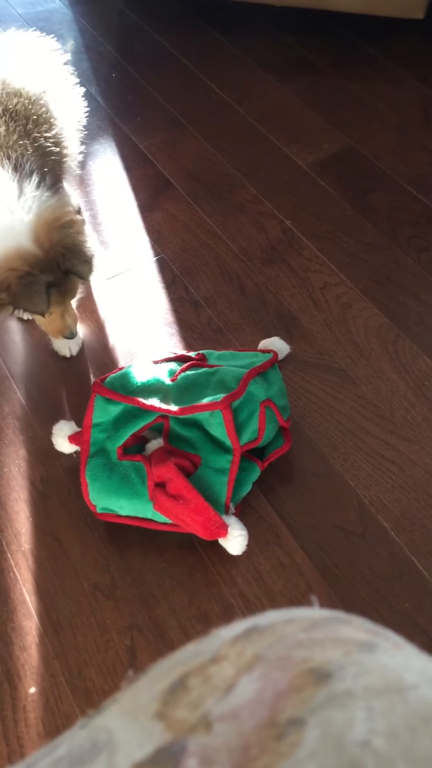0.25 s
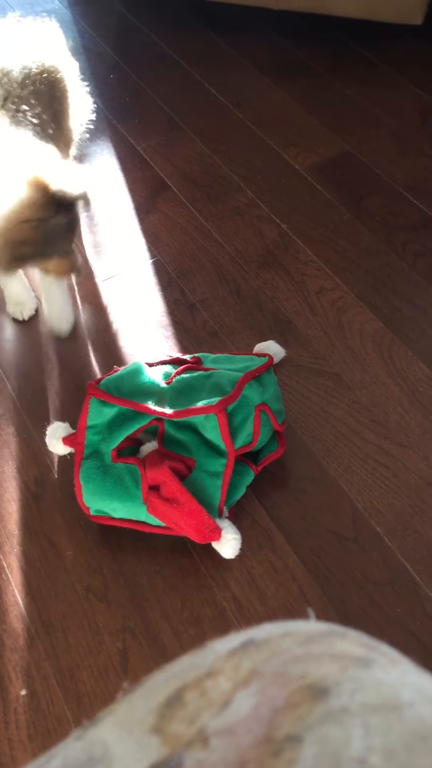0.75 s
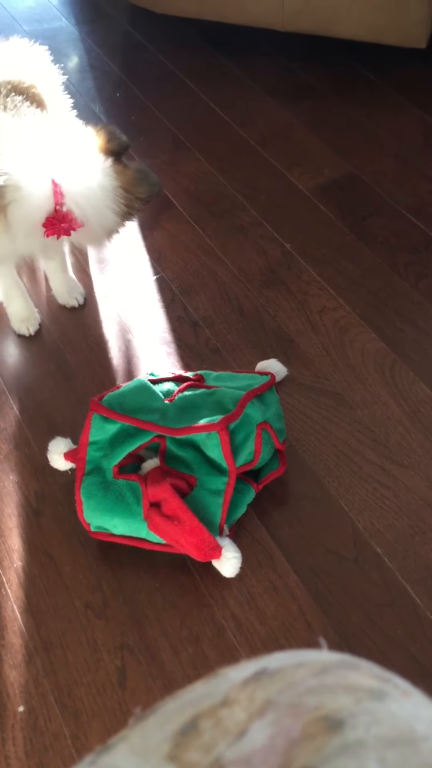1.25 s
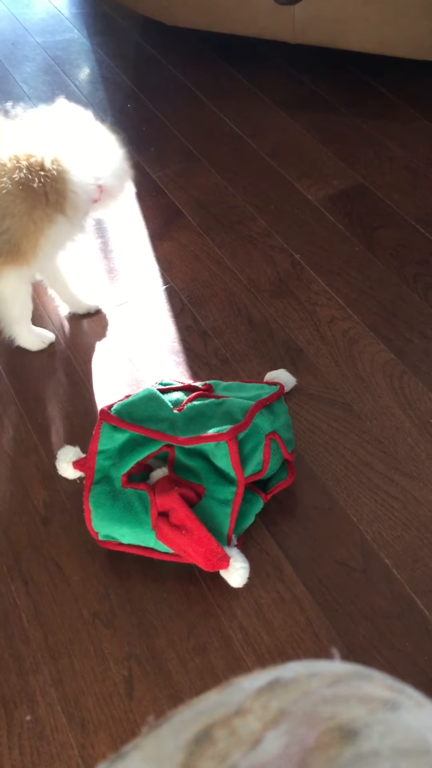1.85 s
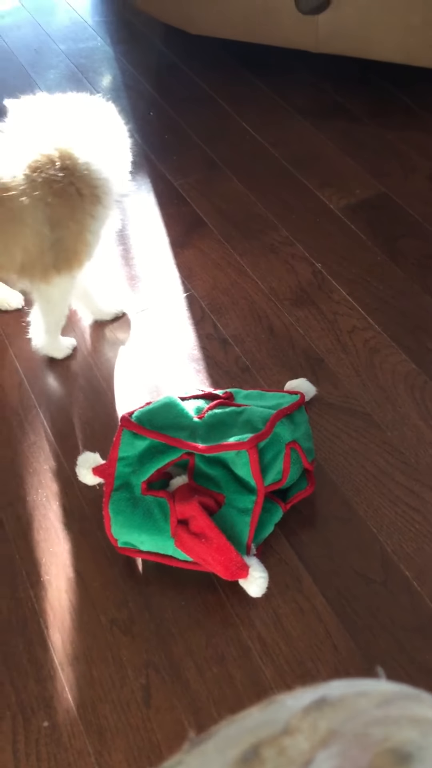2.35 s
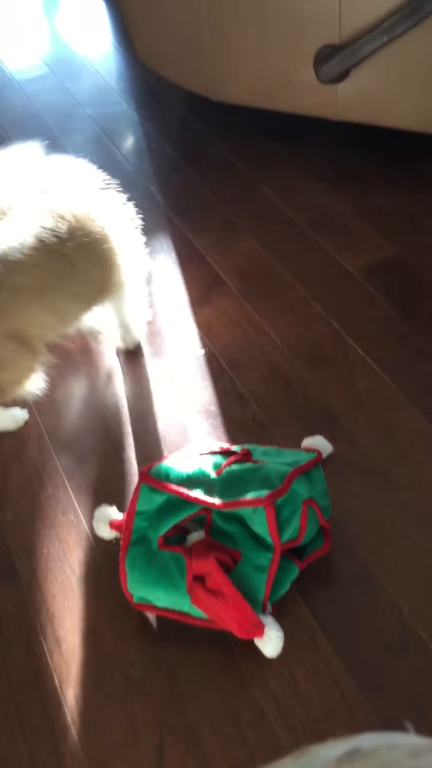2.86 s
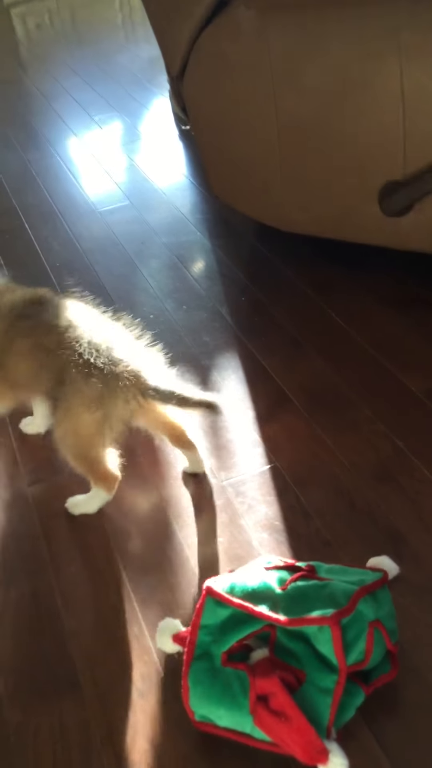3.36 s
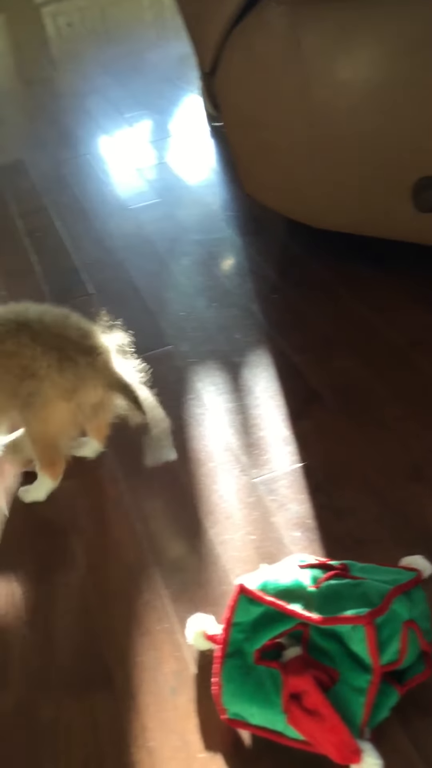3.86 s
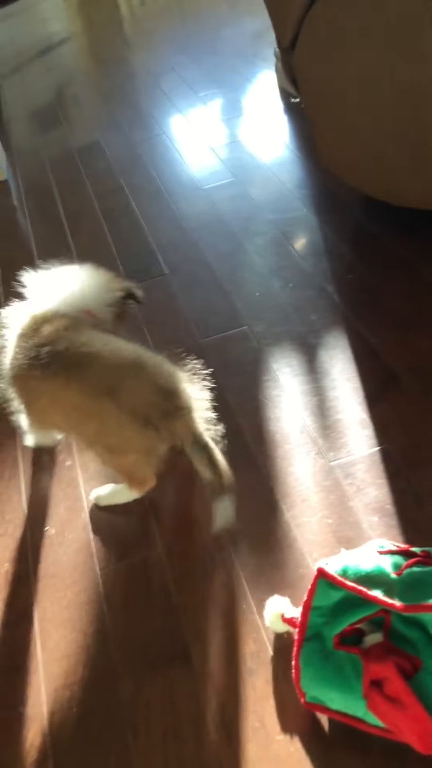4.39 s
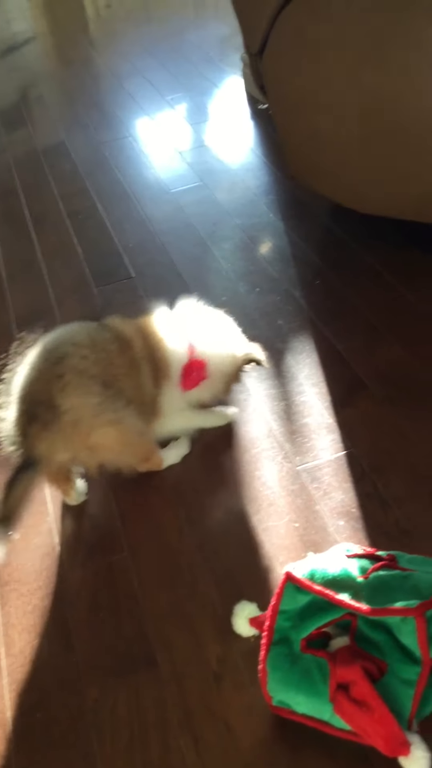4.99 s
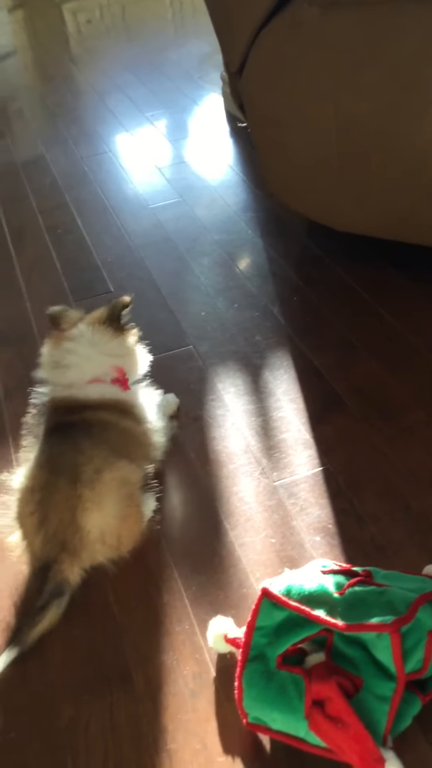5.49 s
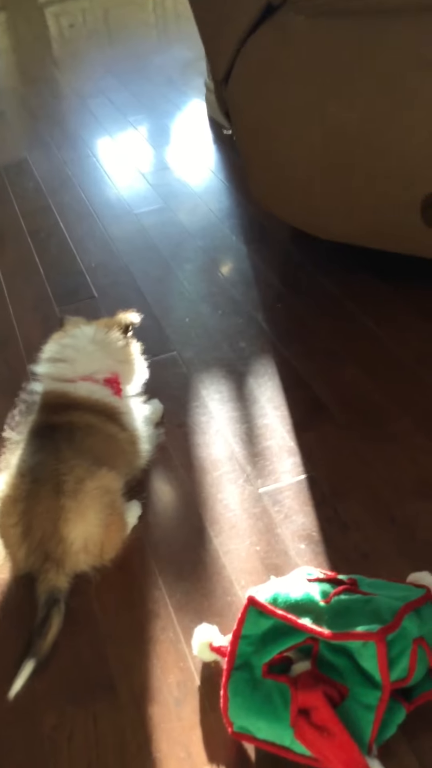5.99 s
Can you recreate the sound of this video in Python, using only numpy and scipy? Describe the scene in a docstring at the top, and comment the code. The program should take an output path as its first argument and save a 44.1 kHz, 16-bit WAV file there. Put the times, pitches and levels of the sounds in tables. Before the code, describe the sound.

In a quiet living room, a puppy's claws tap faintly on a hardwood floor, in small clusters with pauses between them. The taps grow louder and quicker, mixed with short scratches and soft low paw thumps, and peak in a brief scramble. After a few faint scuffs, something close by gives one soft creak. The room rings slightly, and a low rumble lies underneath.

```python
"""Claws tap and scratch on a hardwood floor as a puppy steps, skids and pounces in a quiet living room.
Each tap is a click of the claw and a knock of the board. Sliding claws catch on the grain, nail tips
ping off the varnish, soft pads shuffle, and the puppy's weight thumps the floor. The room rings on.
Near the end something close by creaks softly as it sticks and slips. A low rumble lies under it all."""
import sys
import numpy as np
from scipy import signal
from scipy.fft import rfft, irfft, next_fast_len
from scipy.io import wavfile
from scipy.ndimage import uniform_filter1d

SR = 44100
rng = np.random.default_rng(int(sys.argv[2]) if len(sys.argv) > 2 else 0)


def master_out(mix):
    """Clip the mix to full scale and print it as 16-bit PCM to the path in sys.argv[1]."""
    frames = np.transpose(np.atleast_2d(mix))
    ceiling = np.clip(frames, -1, 1)
    pcm = np.round(ceiling * 32767).astype(np.int16)
    wavfile.write(sys.argv[1], SR, pcm)


N = 274958
T = np.arange(SR // 8) / SR  # seconds within one touch of the floor


def claw_taps(knock_db=-3.5, rattle_db=-9, chatter=0.1, knock_width_hz=560, click_width_hz=1000,
              knock_t60=0.093, click_t60=0.062, tick_t60=0.053, strike_s=0.001):
    """A claw taps with a tick and a click; the board knocks, its pitch unsteady as the claw chatters."""
    # claw taps and a couple of their quick echoes: t/s, level/dB, board f/Hz, click f/Hz,
    # hardness (0 = padded, 1 = bare claw), room level/dB, contact length/s, first blow/dB, board ring/dB
    taps = [(0.3994, -56, 1415, 1950, 0.82, -7.5, 0.01, 0, -20.5),
            (0.936, -60, 1380, 3630, .6, -3, .009, -6, -32),
            (0.986, -52, 1296, 2300, .33, -11, 0.012, -3, -27),
            (1.665, -45.5, 1070, 3600, 0.39, -16, 0.0077, -5, -26),
            (1.676, -41.5, 1122, 2300, 0.35, -16, 0.012, -7, -20),
            (1.729, -34.5, 1295, 2210, 0.19, -12, 0.017, -10, -31),
            (1.7984, -37, 1270, 2000, 0.35, -9, 0.0064, -3, -25),
            (1.8336, -37, 1070, 2100, .22, -14, 0.01, -3, -21.5),
            (1.8425, -37.5, 1090, 1800, .05, -13, 0.0037, -5, -25),
            (1.863, -43, 1080, 2000, 0.022, -20, 0.0042, -1, -31),
            (1.928, -60.5, 1240, 3500, .89, -6, 0.0087, 1, -31),
            (2.069, -59, 1430, 2310, .14, -8, 0.015, -10, -26),
            (2.113, -52.5, 1005, 3700, .53, -3, .012, 1, -32),
            (2.137, -41.5, 1361, 2200, 0.33, -7, 0.013, 3, -24),
            (2.162, -46, 1353, 2420, 0.35, -10.5, 0.0044, -3, -20),
            (2.836, -60.5, 1660, 2200, 0.65, -22, 0.0064, 0, -31),
            (2.8963, -44, 1453, 1800, 0.15, -9.5, 0.0056, -10, -21),
            (2.904, -43, 1243, 1800, 0.13, -9, 0.0027, -17, -23),
            (2.931, -60, 1160, 2950, 0.82, -13, 0.0079, -1, -19),
            (3.269, -61.5, 1430, 2000, .1, -8, 0.031, -10, -22),
            (3.533, -48.5, 1127, 2300, 0.99, -13, .002, -2, -16),
            (3.854, -36.5, 1750, 4140, 0.95, -8.5, 0.0019, 0, -25),
            (3.902, -43, 1186, 3180, .1, -13, 0.016, -12, -17),
            (3.919, -35.5, 1220, 1800, 0.52, -12, 0.0039, -10, -21.5),
            (4.046, -25, 1400, 2040, 0.55, -10, 0.012, 5.5, -21.5),
            (4.386, -59, 1230, 2500, .3, 2, 0.0071, -6, -26),
            (4.429, -51.5, 1385, 4480, 0.61, -5, .009, 0, -26),
            (4.505, -46.5, 1100, 3080, 0.77, -8, 0.0082, 3, -28),
            (4.562, -38, 1285, 3090, .09, -7, 0.018, -10, -20),
            (4.683, -31.5, 1230, 1950, 0.75, -6.5, .005, 5.5, -30),
            (4.7522, -26.5, 1173, 3020, 0.78, -22, 0.01, 14.5, -19.5),
            (4.7928, -24, 1610, 3350, 0.93, -11.5, 0.0049, 3, -34),
            (4.7953, -28.5, 1100, 2400, 0.95, -7.5, 0.0047, -2, -19.5),
            (4.801, -27.5, 1730, 3950, 0.82, -11, 0.0027, 7, -32),
            (5.104, -43.5, 1407, 4400, 0.67, -9.5, .011, -3, -19)]
    # tone of the click: f/Hz, level/dB
    click_tone = [(100, 14.5), (400, 12.5), (900, 7.5), (2000, -1), (3000, -0.5), (4800, 2), (6000, 1.5),
                  (12000, -37)]
    # tone of the high tick: f/Hz, level/dB
    tick_tone = [(2000, -20), (5000, -1), (7000, -3.5), (11000, -7.5), (16000, -11.5)]
    out = np.zeros(N)
    strike = np.exp(-T / strike_s)  # the first blow is the hardest
    for start, db, knock_hz, click_hz, hardness, wet_db, length, strike_db, ring_db in taps:
        click_db = np.interp(hardness, (0, 1), (-24.5, -2.5))
        tick_db = np.interp(hardness ** 2, (0, 1), (-34, -6))  # only a nearly bare claw ticks clearly
        attack_s = np.interp(hardness, (0, 1), (0.00069, 0.00051))  # a pad eases in more slowly
        contact = amp(strike_db) * strike + decay(T, knock_t60) / (1 + (T / length) ** 8)
        contact *= 1 - np.exp(-T / attack_s)
        pitch = knock_hz * (1 + chatter * wander(len(T), count=60))
        wood = lambda f: abs(resonance(f, knock_hz, knock_width_hz)) ** 2 + 0.075
        rattle = burst(lambda f: wood(f) / (1 + (f / 2600) ** 4), contact)
        knock = contact * glide(pitch) + amp(rattle_db) * rattle
        claw = lambda f: 0.074 + abs(resonance(f, click_hz, click_width_hz))
        click = burst(lambda f: amp(along(click_tone, f)) * board_gain(f) * claw(f), decay(T, click_t60))
        tick = burst(lambda f: amp(along(tick_tone, f)), decay(T, tick_t60) + strike ** 4)
        tap = amp(knock_db) * knock + amp(click_db) * click + amp(tick_db) * tick
        add(out, start, in_room(amp(db) * tap, wet_db))
        add(out, start, amp(db + ring_db) * board_ring(knock_hz))
    return out


def board_ring(hz, ring_t60=0.63, width_hz=85, swell_s=0.012):
    """The struck board hums on in a narrow band around its own pitch."""
    t = np.arange(SR // 2) / SR
    envelope = (1 - np.exp(-t / swell_s)) * decay(t, ring_t60)
    return burst(lambda f: abs(resonance(f, hz, width_hz)) ** 2, envelope)


def board_gain(hz):
    """The boards boost the pitches at which they naturally ring."""
    # ringing pitches of the boards: f/Hz, width/Hz, level/dB
    modes = [(540, 99, 3), (1079, 13, 11), (1360, 88, -13), (1640, 260, 8), (2290, 230, 6), (2460, 51, 8),
             (3086, 200, 2.5), (3580, 86, 1), (4030, 160, -1), (4420, 320, -19), (5320, 310, -5),
             (5780, 40, 1), (7080, 44, -22)]
    power = sum(abs(2 * amp(db) * resonance(hz, centre, width)) ** 2 for centre, width, db in modes)
    return np.sqrt(1 + power)


def nail_pings(ping_t60=0.034, width_hz=650):
    """The tip of a nail flicks off the varnish and rings briefly at its own bright pitch."""
    # nail flicks: t/s, level/dB, f/Hz
    flicks = [(0.402, -57, 4360), (0.938, -69, 5450), (1.796, -50.5, 4230), (1.799, -44, 2340),
              (2.136, -64, 4560), (4.046, -35.5, 2250), (4.794, -52, 4300)]
    out = np.zeros(N)
    for start, db, hz in flicks:
        ping = burst(lambda f: abs(resonance(f, hz, width_hz)) ** 3, decay(T, ping_t60))
        add(out, start, in_room(amp(db) * ping, wet_db=-18.5))
    return out


def claw_scrapes(rough_db=0.8, uneven_db=0.7, grain_db=5, rise_share=0.46,
                 scratch_width_hz=220, nail_hz=4370, nail_width_hz=120, nail_db=-3.5):
    """A sliding claw catches on the grain many times a second; each catch rings claw and boards."""
    # slides: loudest t/s, level/dB, length/s, treble tilt/(dB per octave), scratch f/Hz, claw ring/dB
    slides = [(0.395, -66, 0.022, -1, 4830, 8), (0.403, -71, 0.08, 7, 4700, -11),
              (1.674, -57, 0.033, 2, 3600, -13), (3.041, -70, 0.029, 9, 4760, 7),
              (3.579, -56, 0.021, 1.5, 3150, -11), (3.778, -60.5, 0.043, 5, 6900, 5),
              (3.826, -57.5, 0.048, 6.5, 4320, -2), (3.833, -44, 0.019, 8, 5440, -14),
              (3.857, -35.5, 0.008, 5, 3500, -25), (3.98, -57, .009, 5, 7840, 6),
              (4.254, -66.5, 0.024, 0, 4500, -13), (4.391, -73, 0.19, 5.5, 4540, -10),
              (4.526, -61.5, .04, 6, 4480, 1), (4.564, -40, 0.022, 2.5, 3080, -2.5),
              (4.695, -40, .014, 1.5, 2580, 0), (4.706, -47.5, 0.024, 3, 3690, 8),
              (4.731, -56, 0.022, 5, 4700, -2), (4.792, -38, 0.0067, 1, 2800, 10),
              (4.826, -48, .009, 0, 1750, 9), (4.847, -48, .035, 1, 4300, 7),
              (5.21, -68, 0.17, 6.5, 4500, -22), (5.379, -63.5, 0.074, 3, 1940, 0),
              (5.44, -64.5, 0.16, 5, 4540, -22)]
    # tone of the gritty rubbing: f/Hz, level/dB
    grit_tone = [(100, -10), (500, -18), (800, -2), (1200, 13.5), (2000, -2), (4500, 4), (8000, -1.5),
                 (13000, -4.5), (16000, -15.5)]
    out = np.zeros(N)
    t = np.arange(-SR // 4, SR // 4) / SR
    for middle, db, length, tilt, scratch_hz, ring_db in slides:
        rise, fall = length * rise_share, length * (1 - rise_share)  # speeding up, slowing down
        stroke = np.exp(-np.abs(t / np.where(t < 0, rise, fall)) ** 1.2)
        catches = amp(rough_db * wander(len(t), count=50) + uneven_db * wander(len(t), count=900))
        grains = catches * rng.standard_normal(len(t)) * amp(grain_db * rng.standard_normal(len(t)))
        nail = lambda f: amp(nail_db) * resonance(f, nail_hz, nail_width_hz)
        claw = lambda f: 1 + 2 * amp(ring_db) * (resonance(f, scratch_hz, scratch_width_hz) + nail(f))
        grit = lambda f: amp(along(grit_tone, f) + tilt * np.log2((f + 500) / 4000))
        scratch = filtered(stroke * grains, lambda f: grit(f) * board_gain(f) * claw(f))
        scratch = unit(across_grain(scratch)) * rms(stroke)
        add(out, middle + t[0], in_room(amp(db) * scratch, wet_db=-8))
    return out


def across_grain(x, patchy_db=3.5):
    """The tone of a scratch shifts from moment to moment as the claw crosses the grain."""
    spectrum = signal.stft(x, nperseg=256)[2]
    patches = uniform_filter1d(rng.standard_normal(spectrum.shape), size=5, axis=0)  # smooth over pitch
    patches = uniform_filter1d(patches, size=7, axis=1)  # and over time
    return signal.istft(spectrum * amp(patchy_db * unit(patches)), nperseg=256)[1][:len(x)]


def pad_scuffs(width_hz=700, rough_db=3):
    """A soft pad shuffles over the boards: a dull, woody rub."""
    # shuffles: loudest t/s, level/dB, length/s, f/Hz
    shuffles = [(0.405, -70, 0.027, 885), (0.995, -66, .025, 850), (1.842, -54, .014, 930),
                (2.902, -64.5, .018, 900), (4.38, -65.5, .035, 1170), (4.428, -63, 0.056, 1100),
                (4.512, -61.5, .025, 1100), (5.107, -55.5, .014, 850), (5.146, -60, .014, 1210)]
    out = np.zeros(N)
    t = T - T.mean()
    for middle, db, length, hz in shuffles:
        stroke = np.exp(-(2 * t / length) ** 2) * amp(rough_db * wander(len(t), count=100))
        rub = burst(lambda f: abs(resonance(f, hz, width_hz)) ** 3, stroke)
        add(out, middle + t[0], in_room(amp(db) * rub, wet_db=-9))
    return out


def paw_thumps(boom_t60=0.23, rise_s=0.0021, trim_db=-4):
    """Soft pads land under the puppy's weight and shake only the low notes out of the floor."""
    # paws landing on the boards: t/s, level/dB
    thumps = [(0.987, -56), (2.168, -52), (2.567, -51), (2.843, -54), (3.271, -59.5), (3.547, -49),
              (3.89, -46), (4.049, -52.5), (4.385, -47), (4.589, -48.5), (4.681, -44.5), (4.738, -38.5),
              (4.752, -46), (4.791, -36), (5.481, -53.5)]
    # tone of the floor's boom: f/Hz, level/dB
    boom_tone = [(30, -34), (80, -9.5), (135, 6), (185, 7.5), (260, -12), (380, -10.5), (530, -20.5),
                 (750, -14), (1200, -45)]
    out = np.zeros(N)
    envelope = (1 - np.exp(-T / rise_s)) * decay(T, boom_t60)
    for start, db in thumps:
        boom = burst(lambda f: amp(along(boom_tone, f)), envelope)
        add(out, start, in_room(amp(db + trim_db) * boom, wet_db=-39))
    return out


def creak(snap_hz=1600, snap_s=0.00069, sag_s=0.00075, dull_hz=1750,
          push_hz=170, push_db=-3, push_t60=0.032, rub_db=-15, rub_s=0.0023, lead_s=0.0015):
    """Something close sticks and slips: each slip is a dull falling snap, a low push and a little rub."""
    # slips: t/s, level/dB
    slips = [(5.646, -53), (5.670, -49), (5.689, -44), (5.701, -37), (5.711, -37), (5.7228, -38.5),
             (5.736, -44), (5.7582, -44), (5.767, -59), (5.774, -63)]
    snaps, grip = np.zeros(N), np.zeros(N)
    rub_shape = np.exp(-abs(T - T.mean()) / rub_s)
    for when, db in slips:
        pitch = push_hz + snap_hz * rng.uniform(0.84, 2.14) * np.exp(-T / sag_s)
        snap = T / snap_s * np.exp(1 - T / snap_s) * glide(pitch)
        push_shape = (1 - np.exp(-T * push_hz)) * decay(T, push_t60)
        push = 2 * amp(push_db) * push_shape * np.sin(2 * np.pi * push_hz * T)
        add(snaps, when - snap_s, amp(db) * (snap + push))
        add(grip, when - lead_s - T.mean(), amp(db + rub_db) * rub_shape)  # peaks just before the snap
    rub = grip * noise(lambda f: abs(resonance(f, 600, 1200)) ** 2 + 0.04, N)
    dull_snaps = filtered(snaps, lambda f: 0.087 + 0.76 / (1 + (f / dull_hz) ** 12))
    return in_room(dull_snaps + rub, wet_db=-14.5, echo_db=-42)[:N]


def in_room(x, wet_db, echo_db=-11, echo_s=0.022, echo_hz=3000, gap_s=0.023, mode_t60=0.27):
    """The room adds a dull ceiling echo and, set by wet_db, a wash of echoes and a few ringing notes."""
    # how long the wash takes to fade by 60 dB: f/Hz, t/s
    fade_times = [(150, 0.47), (600, 0.7), (1200, 0.59), (2500, 0.66), (5000, 0.52), (9000, 0.3),
                  (15000, 0.28)]
    # tone of the wash: f/Hz, level/dB
    wash_tone = [(150, 8.5), (550, 0), (800, -3.5), (1200, -2), (1750, -4.5), (2400, -3), (4500, -4),
                 (9000, -3), (15000, -1)]
    # ringing notes of the room: f/Hz, level/dB
    modes = [(535, 10), (1056, 11), (1148, 14.5), (1172, 16), (1338, 12), (1408, 14), (1636, 13), (1822, 4),
             (2213, 13), (2400, 5), (2520, 7), (2740, 10), (4300, 7)]
    # fresh noise each time, as the wash differs from spot to spot
    hz, t, spectrum = signal.stft(rng.standard_normal(SR * 3 // 4), SR, nperseg=256)
    fade = decay(t, along(fade_times, hz)[:, None]) * np.clip(t / gap_s - 0.5, 0, 1)
    wash = signal.istft(spectrum * fade, SR, nperseg=256)[1]
    wash = filtered(wash / np.linalg.norm(wash), lambda f: amp(along(wash_tone, f)))
    t = np.arange(len(wash)) / SR
    dying = decay(t, mode_t60)
    notes = sum(amp(db) * np.sin(2 * np.pi * (f * t + rng.random())) for f, db in modes)
    answer = amp(wet_db) * (wash + 2 * notes * dying / dying.sum())
    answer[0] += 1  # the direct sound
    smear = np.exp(-2 * np.pi * echo_hz * T)  # the echo loses its treble
    add(answer, echo_s, amp(echo_db) * smear / smear.sum())
    return signal.fftconvolve(x, answer)


def room_rumble(level_db=-63):
    """The steady low rumble and faint hiss of the quiet room."""
    # tone of the background: f/Hz, level/dB
    rumble_tone = [(12, -60), (22, -39), (33, -26.5), (56, 0), (113, -0.5), (176, -2), (233, -8.5),
                   (268, -11.5), (355, -12), (408, -17.5), (1280, -25.5), (1430, -26), (1950, -29.5),
                   (9040, -35.5), (15800, -40)]
    return amp(level_db) * noise(lambda f: amp(along(rumble_tone, f)), N)


def amp(db):
    """Turn decibels into a gain."""
    return 10 ** (np.asarray(db) / 20)


def decay(t, t60):
    """A fade that falls by 60 dB every t60 seconds."""
    return amp(-60 * t / t60)


def rms(x):
    """The average strength of x (root mean square)."""
    return np.sqrt(np.mean(x ** 2) + 1e-20)


def unit(x):
    """Scale x to strength 1."""
    return x / rms(x)


def along(points, hz):
    """Read a curve of (f/Hz, value) points at hz, on a log frequency axis."""
    f, values = np.transpose(points)
    return np.interp(np.log(hz + 1), np.log(f), values)


def resonance(hz, centre, width):
    """The response of something that rings at one pitch, with gain 1 there."""
    return 1j * hz * width / (centre ** 2 - hz ** 2 + 1j * hz * width)


def glide(pitch):
    """A sine tone that follows a changing pitch in Hz."""
    return np.sin(2 * np.pi * np.cumsum(pitch) / SR)


def filtered(x, response):
    """Scale each frequency f in x by response(f)."""
    size = next_fast_len(len(x) + 4096)
    return irfft(rfft(x, size) * response(np.fft.rfftfreq(size, 1 / SR)), size)[:len(x)]


def noise(response, size):
    """Filtered noise of strength 1."""
    return unit(filtered(rng.standard_normal(size), response))


def burst(response, envelope):
    """Filtered noise that follows a loudness curve and is as strong as that curve."""
    return unit(noise(response, len(envelope)) * envelope) * rms(envelope)


def wander(size, count):
    """A random curve of strength 1, smoothed over count samples."""
    return unit(uniform_filter1d(rng.standard_normal(size), count))


def add(track, start_s, x):
    """Mix x into the track from start_s on."""
    i = max(0, round(start_s * SR))
    track[i:i + len(x)] += x[:max(0, len(track) - i)]


def scene():
    """The puppy and the creak over the room's rumble, in one channel."""
    puppy = claw_taps() + nail_pings() + claw_scrapes() + pad_scuffs() + paw_thumps()
    return (puppy + creak() + room_rumble())[None]


def record(dry, top_hz=15900):
    """Cut off all treble above top_hz."""
    return np.array([filtered(x, lambda hz: hz < top_hz) for x in dry])


dry = scene()
out = record(dry)
master_out(out)
```